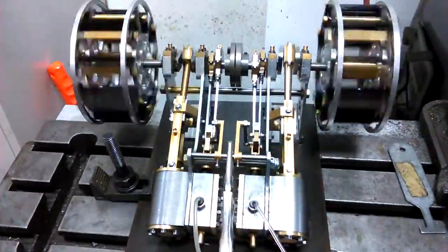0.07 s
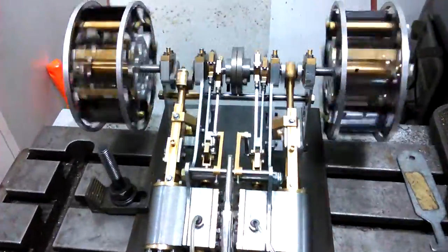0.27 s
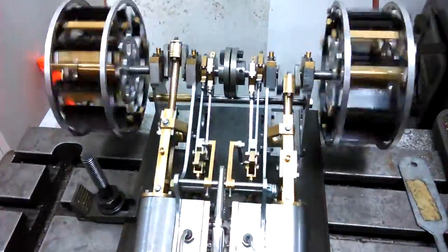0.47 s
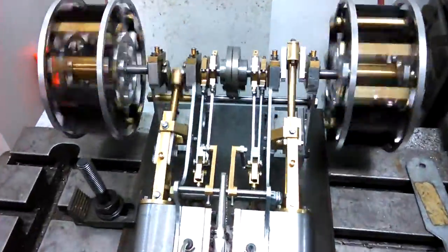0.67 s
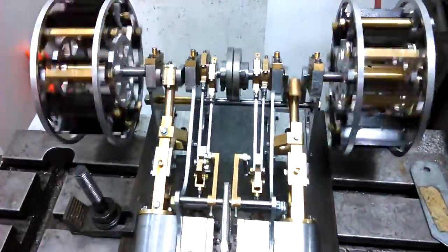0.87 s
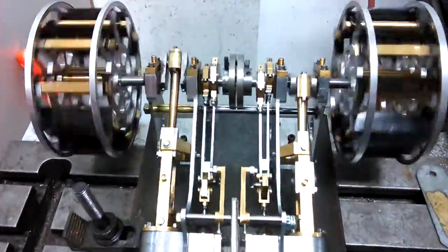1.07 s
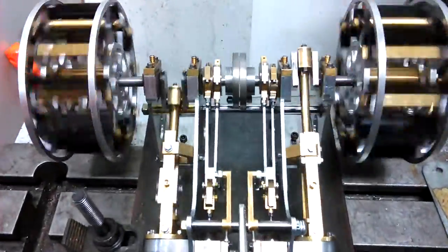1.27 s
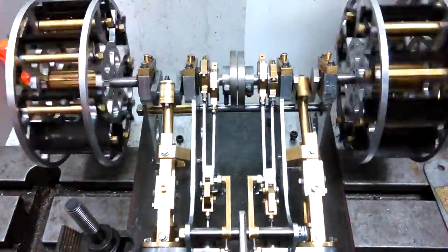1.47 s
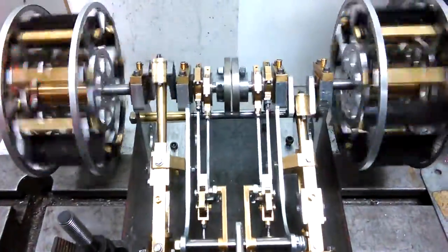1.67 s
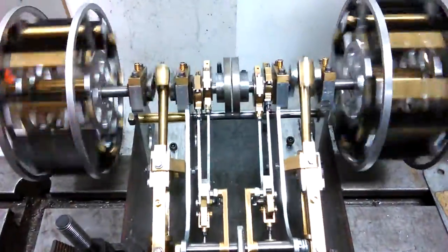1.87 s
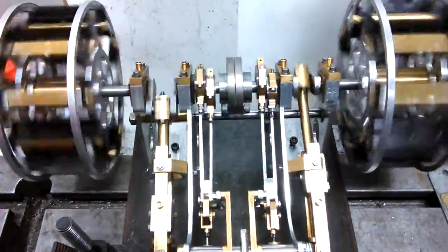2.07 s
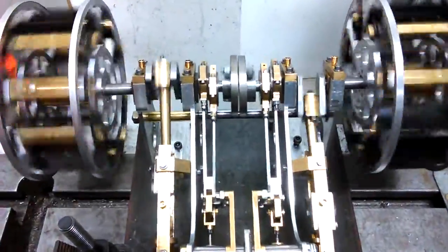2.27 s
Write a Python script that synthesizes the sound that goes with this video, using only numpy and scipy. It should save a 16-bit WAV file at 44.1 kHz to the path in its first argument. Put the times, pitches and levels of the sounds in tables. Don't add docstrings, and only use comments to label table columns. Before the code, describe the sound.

A small twin-cylinder engine runs on compressed air, hissing steadily while four uneven exhaust rushes swell with a thin whistle, each led by a sharp puff; rods knock, pins tick, close handheld stereo in a quiet workshop.

```python
import sys
import numpy as np
from scipy import signal
from scipy.fft import rfft, irfft, next_fast_len
from scipy.io import wavfile
from scipy.ndimage import uniform_filter1d, map_coordinates

SR = 44100
rng = np.random.default_rng(int(sys.argv[2]) if len(sys.argv) > 2 else 0)


def voltage_ratio(decibels):
    exponent = np.asarray(decibels, float) / 20
    return 10 ** exponent


def unload_audio(sound):
    columns = np.transpose(np.atleast_2d(sound))
    steps = np.round(np.clip(columns, -1, 1) * 32767)
    wavfile.write(sys.argv[1], SR, steps.astype(np.int16))


N = 102003


def unit(x):
    return x / np.sqrt(np.mean(x ** 2) + 1e-20)


def along(points, hz):
    f, value = np.transpose(points)
    return np.interp(np.log(hz + 1), np.log(f + 1), value)


def wobble(rate_hz):
    knots = rng.standard_normal(int(N * 400 / SR) + 4)
    return map_coordinates(knots, [np.arange(N) * rate_hz / SR])


def filtered(x, response):
    m = next_fast_len(N + SR // 2)
    return irfft(rfft(x, m) * response(np.fft.rfftfreq(m, 1 / SR)), m)[..., :N]


def peak(f, hz, width_hz):
    return 1j * f * width_hz / (hz * hz - f * f + 1j * f * width_hz)


def air(spectrum, patchy_db, pan_db, lag_s):
    # f/Hz, likeness (1 = the same)
    likeness = [(60, .65), (650, .93), (1300, .45), (2400, .92), (3200, .5), (4400, .35), (5800, .85),
                (8500, .45)]
    noise = signal.stft(rng.standard_normal((2, N)), nperseg=512)[2]
    patches = rng.standard_normal(noise.shape[1:])
    patches = uniform_filter1d(uniform_filter1d(patches, size=2, axis=0), size=9, axis=1)
    pair = signal.istft(noise * voltage_ratio(patchy_db * unit(patches)), nperseg=512)[1][:, :N]

    def mid_and_side(hz):
        turn = np.arccos(np.clip(along(likeness, hz), -1, 1)) / 2
        low_edge = hz ** 2 / (hz ** 2 + spectrum[0][0] ** 2)
        return low_edge * voltage_ratio(along(spectrum, hz)) * [np.cos(turn), np.sin(turn)]

    mid, side = filtered(pair, mid_and_side)
    stereo = np.array([mid + side, mid - side])
    stereo = filtered(stereo, lambda hz: np.exp(np.outer([1, -1], 1j * np.pi * hz * lag_s)))
    return unit(stereo) * voltage_ratio([[pan_db / 2], [-pan_db / 2]])


def gate(start_s, length_s, rise_s, fall_s):
    t = np.arange(N) / SR - start_s
    opening = np.sin(np.clip(t / rise_s, 0, 1) * np.pi / 2) ** 2
    return opening * np.exp(-np.clip(t - length_s, 0, None) / fall_s)


def ring(modes, rise_s, share=1):
    t = np.arange(SR // 8) / SR
    tones = 0
    for hz, db, t60_s in modes:
        level_db = db + rng.normal(0, 1.2) - 60 * t / t60_s / share
        detuned_hz = hz * (1 + 0.012 * rng.standard_normal())
        tones = tones + voltage_ratio(level_db) * np.sin(2 * np.pi * detuned_hz * t)
    return (1 - np.exp(-t / rise_s)) ** 2 * tones


def narrow_hiss(spectrum, hz, width_hz, patchy_db, pan_db, lag_s):
    noise = air(spectrum, patchy_db, pan_db, lag_s)
    return unit(filtered(noise, lambda f: peak(f, hz, width_hz) ** 2))


def exhaust():
    # start t/s, length/s, level/dB, slope/(dB per s)
    strokes = [
        (0.186, 0.34, -32.5, -25),
        (0.715, 0.25, -36, 11.5),
        (1.29, .37, -31.5, -12.5),
        (2.01, 0.99, -35, -13.5),
    ]
    # f/Hz, level/dB
    rush_colour = [(200, -17), (400, -3.5), (1200, -17), (2300, 3.5), (3300, -5), (5500, -17), (9500, -20),
                   (15500, -35)]
    t = np.arange(N) / SR
    rush_level, whistle_level, flow = 0, 0, 0.092 * wobble(22.7)
    for start, length, db, slope in strokes:
        stroke = voltage_ratio(db + slope * (t - start))
        rush_level = rush_level + stroke * gate(start, length, rise_s=0.13, fall_s=0.1)
        whistle_level = whistle_level + stroke * gate(start, length, rise_s=0.069, fall_s=0.047)
        flow = flow + np.sin(np.pi * np.clip((t - start) / length, 0, 1))
    flow = np.clip(flow, 0, 1)

    def breath(hz, width_hz):
        return narrow_hiss([(3000, 0), (9000, 0)], hz, width_hz, patchy_db=2, pan_db=-5, lag_s=.00005)

    whistle = np.sqrt(1 - flow) * breath(5300, 330) + np.sqrt(flow) * breath(5590, 460)
    whistle = whistle + voltage_ratio(1.5 - 7.5 * t) * flow * breath(6750, 430)
    whistle = voltage_ratio(-1 - 12.5) * whistle
    rush = air(rush_colour, patchy_db=1.6, pan_db=-1.5, lag_s=.00006)
    flutter = voltage_ratio(0.6 * wobble(90))
    return flutter * (rush_level * rush + whistle_level * whistle)


def valve_bursts(rows, spectrum, pan_db, lag_s):
    fall_s = .011
    level = sum(voltage_ratio(db) * gate(start, length - fall_s, .002, fall_s) for start, length, db in rows)
    return level * voltage_ratio(1.5 * wobble(200)) * air(spectrum, patchy_db=1.5, pan_db=pan_db, lag_s=lag_s)


def puffs():
    # start t/s, length/s, level/dB
    puff_times = [
        (.122, 0.04, -30.5),
        (.625, 0.037, -28),
        (1.186, 0.044, -27),
        (1.895, 0.036, -29),
    ]
    # f/Hz, level/dB
    puff_colour = [(700, -9), (1500, 1), (3000, 0.5), (4500, -12.5), (7000, -16.5), (9500, -12),
                   (12000, -22.5), (15500, -18)]
    return valve_bursts(puff_times, puff_colour, pan_db=4.5, lag_s=.00026)


def sighs():
    # start t/s, length/s, level/dB
    sigh_times = [(.222, 0.051, -34), (.709, 0.08, -35), (.91, 0.021, -32.5), (1.03, 0.01, -29),
                  (1.1, 0.011, -51), (1.34, 0.012, -33), (2.02, 0.027, -36.5)]
    # f/Hz, level/dB
    sigh_colour = [(500, -44), (1200, 11.5), (2500, 4), (4000, -1), (7000, -8.5), (9500, 0.5), (12500, -8),
                   (15500, -7)]
    return valve_bursts(sigh_times, sigh_colour, pan_db=2.5, lag_s=.0001)


def leak():
    # f/Hz, level/dB
    leak_colour = [(500, -5.5), (1000, -6), (1600, -2.5), (2250, 3.5), (3200, -6.5), (6000, -15),
                   (10000, -13), (15500, -23.5)]
    return voltage_ratio(-33 + 0.83 * wobble(40.26)) * air(leak_colour, patchy_db=2.14, pan_db=1.5, lag_s=.00003)


def fizz():
    # t/s, share of the higher pitch
    drift = [(0, 0.74), (.5, 0.12), (1.1, 0.11), (1.4, 0.97), (1.8, 0.49), (2.3, .4)]
    share = np.clip(np.interp(np.arange(N) / SR, *np.transpose(drift)), 0, 1)

    def hiss(hz, width_hz):
        return narrow_hiss([(6000, 0), (12000, 0)], hz, width_hz, patchy_db=5.5, pan_db=1.0, lag_s=.00003)

    return voltage_ratio(-48) * (np.sqrt(1 - share) * hiss(9150, 670) + np.sqrt(share) * hiss(9850, 640))


def echoes(pair):
    # delay/s, level/dB
    left_echoes = [(.0011, -36), (.0029, -29.5), (.0047, -11), (.0083, -46)]
    # delay/s, level/dB
    right_echoes = [(.0014, -24.5), (.0024, -17.5), (.0053, -15.5), (.0074, -21.5)]

    def comb(f, rows):
        return 1 + sum(voltage_ratio(db) * np.exp(-2j * np.pi * f * delay) for delay, db in rows)

    return filtered(pair, lambda f: np.array([comb(f, left_echoes), comb(f, right_echoes)]))


def spits():
    # t/s, peak level/dB, f/Hz
    droplets = [(0.7552, -24, 2160), (0.7736, -18, 2290), (0.831, -21, 2150), (1.0246, -17, 2290),
                (1.0854, -20, 2240), (1.1393, -17.5, 2220), (1.4157, -15, 2170), (1.4546, -14.5, 2270),
                (1.5085, -18, 2060), (1.5953, -20, 2310), (1.6571, -37, 2310), (1.6731, -21, 2320),
                (2.1126, -19, 2120), (2.1355, -17.5, 2180)]
    out = np.zeros(N + SR)
    for start, db, hz in droplets:
        drop_ring = ring([(hz, 0, 0.034)], rise_s=0.00049)
        out[round(start * SR):][:SR // 8] += voltage_ratio(db - 5 - 6.5) * drop_ring
    return out[:N]


def knocks():
    # t/s, peak level/dB, level of the upper tones over the bed's/dB, share of the full ring time
    blows = [(.027, -30.5, 3, 1.4), (.048, -30.5, 7, 1.2), (.068, -33, 0, 0.71), (.08, -34, 0, .5),
             (.095, -37.5, 1, 0.54), (.123, -39, 3, 0.36), (.131, -32.5, 8, 0.64), (.144, -29, 1.5, 0.78),
             (.212, -28.5, -1, 0.83), (.225, -35, 11, 0.9), (.230, -27, -2, 0.81), (.245, -37, -18, 1.1),
             (.353, -45, 0, 0.6), (.374, -38, 6, .5), (.399, -35, 4, 1.3), (.451, -33.5, 3, 1),
             (.5205, -27, -8, 0.35), (.626, -42, 1, 0.35), (.644, -35, 3, 0.4), (.712, -29.5, -1.5, .9),
             (.724, -30, 26, 0.61), (.732, -28.5, -6, 1.3), (.738, -35, 1, 0.83), (.747, -31, -20, 0.74),
             (.914, -32, -13, 0.24), (.985, -29.5, 4, 1.3), (1.0, -39, 3, 0.76), (1.022, -38, 9, .5),
             (1.0631, -22, -6, 0.28), (1.078, -35, 8, 0.35), (1.183, -39.5, 5, 0.79),
             (1.2065, -25.5, -7, 0.66), (1.212, -29.5, 8, 0.2), (1.216, -33.5, -11, 0.4),
             (1.331, -33.5, -11, 0.43), (1.436, -40, 1, 0.58), (1.473, -35.5, -2, 2.5),
             (1.648, -33, 5, 0.7), (1.7655, -27.5, -13, 0.53), (1.841, -37.5, -1, 0.35),
             (1.894, -41, 6, 0.44), (1.918, -28, 3, 0.8), (1.996, -27.5, 5.5, 0.38), (2.017, -32, -13, 0.3),
             (2.024, -28.5, -11, 0.82), (2.048, -28, -9, 0.65), (2.091, -37, 11, .5),
             (2.193, -32.5, -6, 0.63), (2.288, -33.5, 4.5, 0.65)]
    # f/Hz, level/dB, time to fade 60 dB/s
    bed_tones = [(645, 0, .07), (550, -5, .03), (820, 1, .03)]
    # f/Hz, level/dB, time to fade 60 dB/s
    upper_tones = [(930, 0.5, 0.033), (1370, -1.5, 0.029), (1670, 3, 0.024)]
    out, rise_s = np.zeros(N + SR), .001
    for start, db, sharp_db, share in blows:
        blow = ring(bed_tones, rise_s, share) + voltage_ratio(sharp_db) * ring(upper_tones, rise_s / 2, share)
        out[round(start * SR):][:SR // 8] += voltage_ratio(db) * blow / np.abs(blow).max()
    return filtered(out[:N], lambda f: peak(f, 940, 2100))


def ticks():
    # t/s, peak level/dB, pin pitch f/Hz
    clicks = [(0.128, -42, 3000), (0.143, -21, 3370), (0.625, -32, 3100), (0.644, -30, 3100),
              (.712, -27, 2850), (.760, -31, 8800), (.831, -19.5, 2250), (1.192, -19, 2850),
              (1.204, -19, 4920), (1.205, -29, 2640), (1.345, -30, 5200), (1.899, -33, 3050),
              (1.9025, -18, 2660), (1.917, -18.5, 1940), (1.998, -31, 2600), (2.067, -30, 5500),
              (2.197, -41, 5350)]
    out, t = np.zeros(N + SR), np.arange(SR // 8) / SR
    for start, db, hz in clicks:
        crack = voltage_ratio(-2.5 - 60 * t / 0.0043) * rng.standard_normal(len(t))
        pin = ring([(hz, 0, 0.013)], rise_s=0.000078)
        out[round(start * SR):][:len(t)] += voltage_ratio(db - 6.5) * (pin + crack)
    return out[:N]


def room(x):
    t, t60_s = np.arange(SR // 3) / SR, 0.29
    tail = rng.standard_normal((2, len(t))) * voltage_ratio(-60 * t / t60_s) * (t > .003)
    return signal.fftconvolve(x[None], tail / np.linalg.norm(tail[0]), axes=1)[:, :N]


def thumps():
    # t/s, peak level/dB, length/s, lean of the second swing
    gusts = [(0.511, -35.5, .007, 0.23), (0.57, -41, 0.0034, .3), (.598, -23, 0.0026, 0.94),
             (0.641, -34, 0.0034, 0.35), (0.655, -25.5, 0.0022, 0), (0.666, -30.5, 0.0014, 0),
             (0.687, -29.5, 0.0034, 0.75), (0.78, -46, 0.0065, .5), (0.891, -36.5, 0.0033, 0.82),
             (0.914, -47, 0.0018, 0.034)]
    t, push = np.arange(N) / SR, 0
    for start, db, length, lean in gusts:
        v = (t - start) / length
        push = push + voltage_ratio(db) * (v * v - 1 + lean * v) * np.exp(-v * v / 2)
    return push * voltage_ratio([[-47], [0]])


def shop():
    # t/s, level/dB
    draught = [(0, 1.5), (.5, 3), (1, 1), (1.1, 5), (1.3, 0), (1.43, 7), (1.55, -1.5), (1.9, -3), (2.2, 6)]
    # f/Hz, level/dB
    shop_colour = [(40, 2.5), (70, -9), (140, -8), (220, -12.5), (300, -10.5), (600, -14), (1000, -6.5)]
    draught_db = np.interp(np.arange(N) / SR, *np.transpose(draught)) + 1.2 * wobble(8.94)
    murmur = air(shop_colour + [(1600, -73)], patchy_db=1.0, pan_db=0.5, lag_s=.00005)
    return voltage_ratio(-57 + draught_db) * murmur


def scene():
    # t/s, level/dB
    supply = [(.17, -4), (.34, 2), (.46, 1.5), (.6, -2), (.75, 2), (.835, 1.5), (.98, 0.5), (1.15, 1),
              (1.3, 1), (1.378, 1.5), (1.45, 2.5), (1.5, 2), (1.68, 4.5), (1.86, -1.5), (2, 1.5),
              (2.1, 3.5), (2.2, 6), (2.31, 3.5)]
    supply_db = np.interp(np.arange(N) / SR, *np.transpose(supply))
    hiss = voltage_ratio(supply_db) * exhaust() + voltage_ratio(0.4 * supply_db) * leak()
    hiss = hiss + puffs() + sighs() + fizz()
    rods, pins = knocks(), ticks()
    hits = rods * voltage_ratio([[0], [-3.5]]) + pins * voltage_ratio([[-3], [0]]) + spits()
    hits = hits + voltage_ratio(-11.5) * room(rods + pins)
    return voltage_ratio(-7.5) * echoes(hiss) + hits + thumps() + shop()


def roll_off(x):
    return signal.sosfilt(signal.butter(12, 15670, fs=SR, output="sos"), x)


def record(dry):
    # f/Hz, width/Hz, level/dB
    left_port = [(2066, 710, 6.5), (3150, 250, -6), (9660, 480, 3), (12000, 1600, -7)]
    # f/Hz, width/Hz, level/dB
    right_port = [(2360, 564, 10.1), (5260, 830, 6.86), (6520, 1550, 8.5), (8020, 760, 4.2),
                  (8764, 310, 8.7), (9900, 280, 0.56)]
    # f/Hz, phase/radians
    left_lead = [(600, .2), (1200, 1.1), (2000, 0), (2800, .3), (3400, 2.6), (4300, 6), (5500, 6),
                 (6300, 8)]

    def port(f, peaks):
        return 1 + sum(voltage_ratio(db) * peak(f, hz, width) for hz, width, db in peaks)

    def phone(f):
        band = (f < 15750) * f ** 4 / (f ** 4 + 36 ** 4)
        lead = np.exp(np.outer([.5j, -.5j], along(left_lead, f)))
        return np.array([port(f, left_port), port(f, right_port)]) * band * lead

    mix = filtered(dry, phone) + .0011
    return roll_off(mix)


dry = scene()
out = record(dry)
unload_audio(out)
```